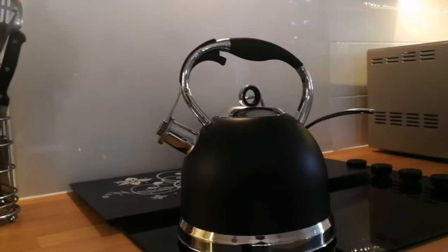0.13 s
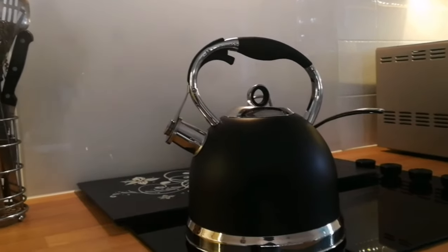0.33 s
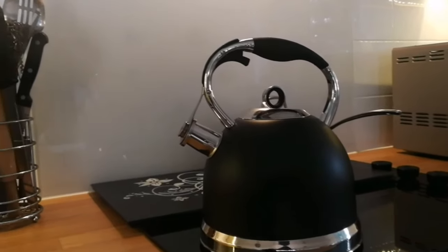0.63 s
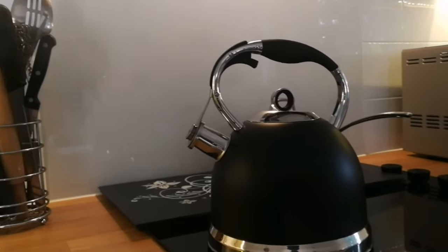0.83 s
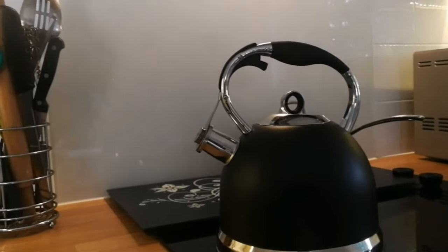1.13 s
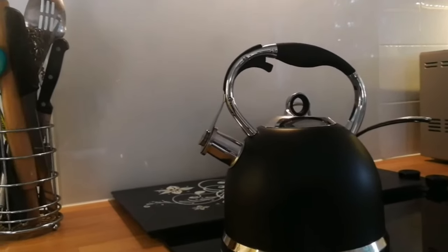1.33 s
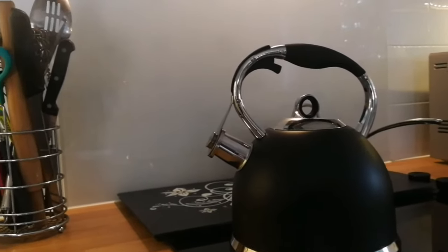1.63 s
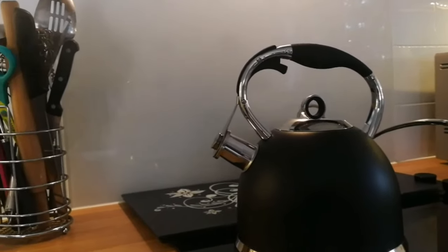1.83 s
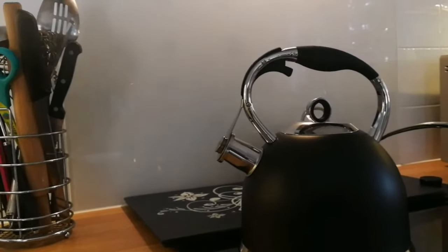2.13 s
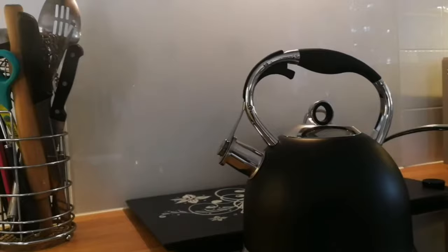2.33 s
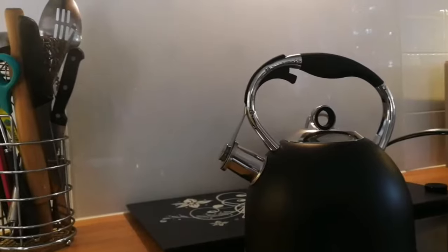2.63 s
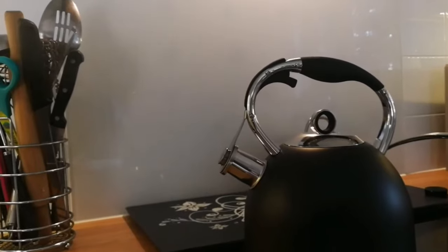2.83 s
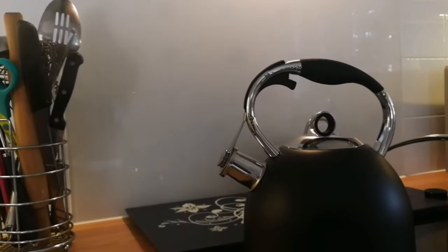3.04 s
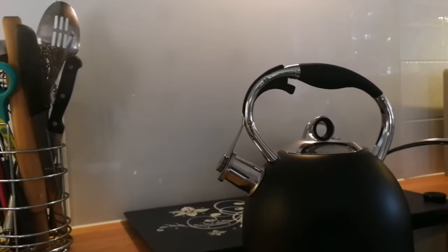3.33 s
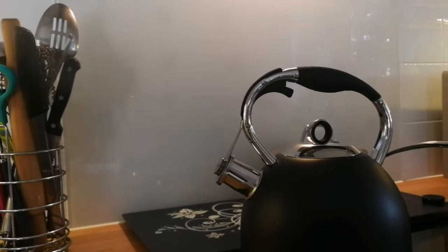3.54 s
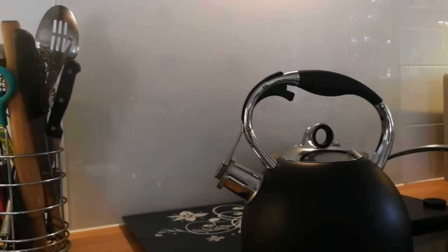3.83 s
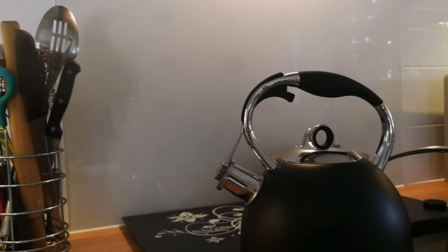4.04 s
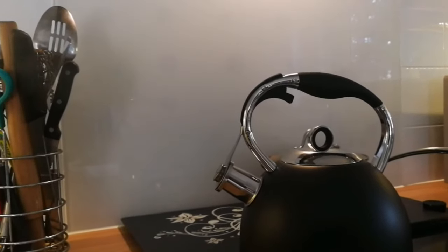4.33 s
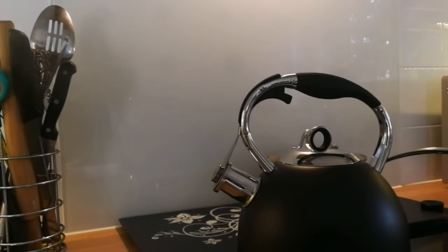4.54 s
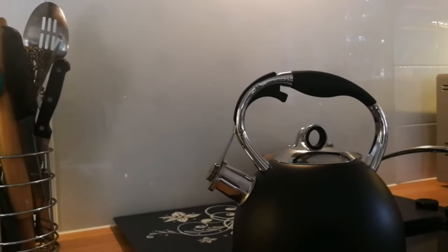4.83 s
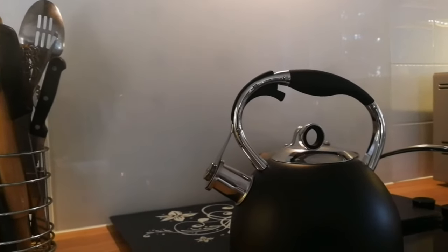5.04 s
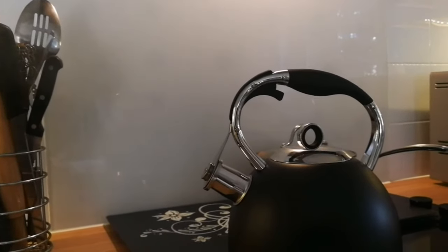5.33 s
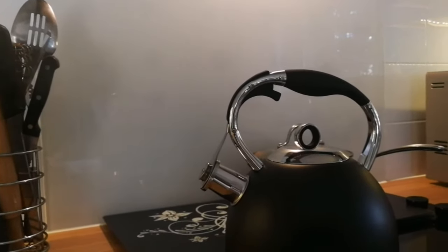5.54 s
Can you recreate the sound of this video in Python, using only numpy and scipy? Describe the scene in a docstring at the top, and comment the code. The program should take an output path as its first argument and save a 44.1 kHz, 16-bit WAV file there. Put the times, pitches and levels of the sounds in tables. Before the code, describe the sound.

A stovetop kettle is already whistling at full boil and never stops. Its single piercing high note wavers slightly in pitch and flutters in loudness, differently at each ear, as the close stereo microphone drifts in a small, hard-walled kitchen. A thin steam hiss and very quiet bubbling rumble lie far beneath, with a few barely noticeable handling thuds in the first half second.

```python
"""In a small kitchen a stovetop kettle whistles at a full boil, heard through a slowly moving stereo microphone.
The jet sings near 4 kHz and sharpens as steam pressure surges; each partial beats with its own dense echoes
off tiles and worktop, so the tone flutters differently at each ear. Shaped, patchy noise makes the hiss at
the spout and the low rumble of the boil; narrow noise rings make the spout's other notes and a brief undertone.
Breathy swells, a faint hum of wavering sines and a few decaying-sine bumps of the hand fill in the rest."""
import sys
import numpy as np
from scipy import signal
from scipy.fft import rfft, irfft
from scipy.io import wavfile
from scipy.ndimage import uniform_filter1d

SR = 44100
rng = np.random.default_rng(int(sys.argv[2]) if len(sys.argv) > 2 else 0)


def wav_record(signal):
    """Record a signal, one row per channel, as 16-bit PCM in the file named by sys.argv[1]."""
    frames = np.transpose(np.atleast_2d(signal))
    bounded = np.clip(frames, -1, 1)
    # unit amplitude maps onto the largest positive 16-bit level
    quanta = np.round(bounded * 32767).astype(np.int16)
    wavfile.write(sys.argv[1], SR, quanta)


N = 250488
TIME = np.arange(N) / SR

# note of the spout, which rises with steam pressure: t/s, f/Hz
WHISTLE_PITCH = [(0.0, 3994), (0.052, 4033), (0.08, 3968), (0.255, 3983), (0.275, 3947), (0.371, 3988),
                 (0.415, 3968), (0.487, 3978), (0.531, 3952), (0.575, 3975), (0.615, 3961), (0.647, 3983),
                 (0.686, 3947), (0.714, 3979), (0.758, 3944), (0.818, 3949), (0.862, 4017), (0.886, 3971),
                 (0.91, 3999), (0.946, 3988), (0.982, 3931), (0.998, 3938), (1.038, 3872), (1.054, 3880),
                 (1.082, 3961), (1.125, 3931), (1.181, 4031), (1.225, 3992), (1.293, 3983), (1.317, 4008),
                 (1.341, 3953), (1.393, 3951), (1.433, 4065), (1.465, 4029), (1.493, 4045), (1.533, 4003),
                 (1.556, 4068), (1.62, 4054), (1.656, 4144), (1.68, 4067), (1.74, 4023), (1.76, 4052),
                 (1.784, 4012), (1.804, 4040), (1.908, 3984), (1.952, 4007), (1.999, 3975), (2.019, 4035),
                 (2.127, 4001), (2.163, 4034), (2.231, 3977), (2.251, 4023), (2.299, 4026), (2.315, 4077),
                 (2.339, 4022), (2.403, 4014), (2.434, 3964), (2.486, 4014), (2.518, 4022), (2.546, 3979),
                 (2.614, 3991), (2.654, 4035), (2.706, 3999), (2.762, 4008), (2.826, 3938), (2.885, 3930),
                 (2.897, 3972), (2.925, 3978), (3.013, 3964), (3.037, 3996), (3.109, 3967), (3.241, 3976),
                 (3.253, 4036), (3.285, 4067), (3.352, 4037), (3.376, 3991), (3.432, 3960), (3.496, 4001),
                 (3.516, 3986), (3.58, 3988), (3.6, 3950), (3.62, 3993), (3.672, 3962), (3.72, 3969),
                 (3.755, 3950), (3.811, 3989), (3.883, 4116), (3.987, 4009), (4.035, 4044), (4.051, 3998),
                 (4.075, 4020), (4.167, 4083), (4.21, 3966), (4.262, 3957), (4.286, 3999), (4.322, 3975),
                 (4.338, 4001), (4.406, 3971), (4.45, 3985), (4.482, 3892), (4.502, 3927), (4.526, 3875),
                 (4.558, 3922), (4.61, 3899), (4.633, 3931), (4.721, 3926), (4.765, 3978), (4.845, 3934),
                 (4.873, 3961), (4.893, 3919), (4.977, 3956), (5.033, 3956), (5.088, 3975), (5.156, 3910),
                 (5.22, 3929), (5.252, 3906), (5.296, 4008), (5.316, 3977), (5.332, 4013), (5.368, 3939),
                 (5.412, 3964), (5.444, 3918), (5.464, 3962), (5.48, 3911), (5.527, 3967), (5.555, 3920),
                 (5.579, 3971), (5.635, 3895), (5.651, 3942), (5.683, 3930)]
# fundamental, drifting as the microphone moves through standing waves: t/s, left level/dB, right level/dB
FUNDAMENTAL_LEVEL = [(0.0, -18.5, -37.0), (0.14, -25.5, -28.5), (0.29, -26.5, -24.5), (0.39, -20.5, -33.0),
                     (0.47, -25.0, -27.5), (0.56, -25.5, -30.0), (0.63, -33.5, -23.5), (0.71, -26.0, -28.5),
                     (0.77, -32.0, -29.5), (0.92, -24.0, -31.0), (1.06, -37.5, -28.0), (1.18, -30.5, -28.0),
                     (1.28, -23.5, -37.5), (1.34, -31.0, -29.0), (1.58, -33.0, -30.5), (1.65, -28.5, -28.5),
                     (1.81, -38.0, -32.0), (1.91, -26.0, -31.5), (2.01, -28.5, -33.0), (2.06, -36.5, -29.5),
                     (2.24, -28.5, -32.5), (2.3, -37.0, -28.0), (2.44, -29.5, -35.0), (2.51, -31.5, -32.0),
                     (2.57, -27.5, -34.0), (2.73, -32.0, -33.0), (2.85, -36.0, -20.5), (2.94, -28.0, -28.0),
                     (3.28, -31.5, -28.0), (3.55, -26.5, -31.0), (3.6, -31.0, -31.5), (3.73, -28.0, -27.5),
                     (3.78, -31.5, -32.0), (3.89, -24.0, -22.0), (3.97, -31.5, -27.0), (4.17, -30.5, -26.5),
                     (4.4, -26.5, -35.0), (4.46, -28.0, -29.0), (4.73, -35.5, -20.0), (4.79, -26.0, -28.5),
                     (4.92, -32.0, -19.5), (5.06, -27.0, -32.5), (5.13, -32.0, -25.0), (5.24, -34.0, -20.5),
                     (5.33, -31.5, -29.5), (5.42, -38.0, -23.0), (5.57, -29.5, -22.5), (5.67, -30.0, -23.0)]
# octave, which also grows when the spout is blown harder: t/s, left level/dB, right level/dB
OCTAVE_LEVEL = [(0.0, -37.0, -37.5), (0.62, -27.5, -38.5), (0.8, -31.0, -40.5), (1.12, -37.0, -35.0),
                (1.24, -30.0, -33.5), (1.37, -34.5, -31.5), (1.59, -27.5, -29.5), (1.92, -32.5, -37.0),
                (2.13, -30.5, -36.5), (2.65, -32.5, -35.5), (3.13, -39.5, -37.0), (3.31, -26.5, -31.5),
                (3.43, -35.5, -36.0), (3.76, -36.5, -36.5), (3.86, -26.5, -32.5), (4.12, -29.5, -32.5),
                (4.35, -30.0, -36.0), (4.58, -34.0, -35.5), (4.72, -28.5, -41.5), (4.82, -29.0, -36.0),
                (4.99, -37.0, -40.0), (5.08, -34.0, -35.0), (5.21, -26.5, -40.5), (5.33, -25.5, -39.0),
                (5.41, -32.0, -39.5), (5.67, -32.0, -39.0)]
# weak upper partials: multiple of the fundamental, left level/dB, right level/dB
UPPER_PARTIALS = [(3, -46, -52), (4, -64, -83)]
# colour of the jet's hiss: f/Hz, relative level per Hz/dB
HISS_SPECTRUM = [(500, -23.5), (750, -14.5), (1150, -8), (1600, -14), (2600, -11.5), (3700, -6),
                 (5000, -11.5), (5700, -5.5), (7200, -3.5), (8500, 0), (11000, -11.5), (12500, -6.5),
                 (13100, -24.5), (15800, -28)]
# spout resonances stirred without locking on, most of them when the pressure sags:
# f/Hz, half-width/Hz, level at mean pressure/dB, level change per unit of pressure/dB
SPOUT_RESONANCES = [(3448, 18, -71.5, -2), (3660, 59, -69.5, -1.5), (4455, 120, -68, 4),
                    (11370, 110, -74.5, -2)]
# colour of boiling water and room: f/Hz, relative level per Hz/dB
RUMBLE_SPECTRUM = [(20, 0.5), (40, -2), (80, -11.5), (135, -4.5), (190, -9.5), (320, -10), (450, -16),
                   (650, -22), (1200, -47)]
# strength of the rumble before its fixed lift and swell: t/s, level/dB
BOIL_LEVEL = [(0, -64.5), (.8, -64.5), (1.5, -63.5), (2.5, -64.5), (3.5, -65), (5.68, -64)]
# hum of a kitchen appliance: f/Hz, rms level/dB
HUM_TONES = [(100, -89), (146, -74), (221, -74), (500, -83.5)]
# likeness of the two ears for noise: f/Hz, correlation
EAR_LIKENESS = [(30, 0.998), (70, 0.975), (140, 0.97), (280, 0.95), (550, 0.03), (1200, 0.25), (4000, 0.03),
                (15000, 0.4)]
# soft bumps of the hand on the microphone: t/s, envelope peak level/dB, f/Hz, decay/s
HAND_BUMPS = [(0.208, -44, 99, 0.0084), (.322, -54, 112, 0.0096), (.54, -50, 89.6, 0.0032),
              (4.372, -59.5, 73, 0.02)]
# short spells of a faint lower note of the spout: t/s, half length/s, level/dB
UNDERTONE_SPELLS = [(0.4, 0.05, -71), (0.758, 0.076, -63.5), (1.01, 0.035, -61), (1.116, 0.038, -59),
                    (2.97, 0.06, -69), (4.496, 0.05, -65), (4.943, 0.087, -64)]
# soft swells of breathy mid-range hiss: t/s, half length/s, f/Hz, half-width/Hz, level/dB
BREATH_SWELLS = [(1.55, 0.24, 1950, 300, -65.5), (1.55, 0.28, 1130, 374, -68),
                 (5.505, 0.22, 1300, 400, -72)]

# pitch shake from slow to fast, before the fits of turbulence scale it
SWAY_HZ, WAVER_HZ, JITTER_HZ = 3.2, 3.4, 1.8
UNREST_DB = 3.6  # extra shake per unit of pressure above or below the mean
# echoes of the fundamental: level against the direct sound, share common to both ears, decay
ECHO_DB, ECHO_SHARED, ECHO_T60_S = 3.8, 0.22, 0.27
RUMBLE_SWELL_DB, RUMBLE_PATCH_DB = 0.7, 1.1  # rms depths
UNDERTONE_HZ, UNDERTONE_WIDTH_HZ = 2907, 28
EDGE_HZ = 15780


def gain_of(db):
    """Decibels to amplitude."""
    return 10 ** (np.asarray(db) / 20)


def evened(x):
    """Scales to rms 1."""
    return x / np.sqrt(np.mean(x ** 2) + 1e-20)


def read(points, hz):
    """Reads a spectrum table along a log-frequency axis."""
    f, value = np.transpose(points)
    return np.interp(np.log(hz + 1), np.log(f + 1), value)


def follow(rows, at):
    """Reads the other columns of a table at given values of its first column."""
    first, *columns = np.transpose(rows)
    return np.array([np.interp(at, first, column) for column in columns])


def wander(rate_hz, size):
    """Smooth random drift of rms 1, with little above rate_hz."""
    hz = np.fft.rfftfreq(size, 1 / SR)
    spectrum = rfft(rng.standard_normal(size)) / (1 + (hz / rate_hz) ** 6)
    return evened(irfft(spectrum, size))


def stereo_noise(shape):
    """Noise of rms 1 with amplitude spectrum shape(hz), closely alike at both ears in the bass only."""
    hz = np.fft.rfftfreq(N, 1 / SR)
    left, other = rfft(rng.standard_normal((2, N)))
    same = np.clip(read(EAR_LIKENESS, hz), -1, 1)
    right = same * left + np.sqrt(1 - same ** 2) * other
    return evened(irfft(np.array([left, right]) * shape(hz), N))


def patchy(noise, patch_db=2.0):
    """Turbulence: patches some 300 Hz wide and 70 ms long come and go in the noise."""
    cells = signal.stft(noise, nperseg=1024, noverlap=768)[2]
    patches = rng.standard_normal(cells.shape[1:])  # one pattern for both ears
    patches = uniform_filter1d(patches, size=7, axis=0)
    patches = evened(uniform_filter1d(patches, size=12, axis=1))
    cells = cells * gain_of(patch_db * patches)
    return evened(signal.istft(cells, nperseg=1024, noverlap=768)[1][:, :N])


def spell(s, half_s):
    """A smooth rise and fall around time s."""
    return np.exp(-((TIME - s) / half_s) ** 2)


def pressure(t):
    """Steam pressure about its mean, in standard deviations, read from the pitch that rises with it."""
    pitch = follow(WHISTLE_PITCH, t)[0]
    return evened(pitch - pitch.mean())


def kitchen(tone, wet_db, shared, t60):
    """The direct sound plus a dense tail of reflections; a share of them reaches both ears alike."""
    t = np.arange(SR // 2) / SR
    taps = rng.standard_normal((3, len(t)))
    taps *= rng.random((3, len(t))) < 1 / 10  # keep one in ten
    taps *= gain_of(-60 * t / t60)
    taps = np.sqrt(1 - shared) * taps[:2] + np.sqrt(shared) * taps[2]
    taps *= gain_of(wet_db) / np.linalg.norm(taps, axis=1, keepdims=True)
    taps[:, 0] += 1  # direct sound
    return signal.fftconvolve(tone[None], taps, axes=1)[:, :len(tone)]


def partial(turns, level_db, span_s, wet_db, shared=0, t60=0.3):
    """One partial beats with its own echoes; the quick flutter rides on the slow level at each ear."""
    heard = kitchen(np.exp(2j * np.pi * turns), wet_db, shared, t60)
    size = int(span_s * SR / 2)
    slow_power = uniform_filter1d(uniform_filter1d(abs(heard) ** 2, size), size)
    fluttering = heard.real * np.sqrt(2 / (slow_power + 1e-9))
    return gain_of(level_db) * fluttering[:, -N:]


def whistle(fitful_db=2):
    """Vortices shed in the spout cap lock into one note. It wobbles with the boil, and turbulence shakes it
    in fits, more so in a surge or a sag. Each quick step of pitch beats against the echo of the note before it."""
    t = np.arange(-SR // 2, N) / SR  # the room is already ringing
    wobble = wander(22.8, len(t))
    wobble = evened(wobble - uniform_filter1d(wobble, size=SR // 8))
    shake = SWAY_HZ * wobble + WAVER_HZ * wander(68, len(t)) + JITTER_HZ * wander(203, len(t))
    shake *= gain_of(UNREST_DB * abs(pressure(t)) + fitful_db * wander(6.5, len(t)))
    turns = np.cumsum(follow(WHISTLE_PITCH, t)[0] + shake) / SR  # phase in cycles

    out = partial(turns, follow(FUNDAMENTAL_LEVEL, TIME), span_s=0.086,
                  wet_db=ECHO_DB, shared=ECHO_SHARED, t60=ECHO_T60_S)
    out += partial(2 * turns, follow(OCTAVE_LEVEL, TIME), span_s=0.27, wet_db=7.5, t60=0.29)
    for multiple, left_db, right_db in UPPER_PARTIALS:
        out += partial(round(multiple) * turns, [[left_db], [right_db]], span_s=0.32, wet_db=3.5, t60=0.19)
    return out


def steam(hiss_db=-53.0, surge_db=0.2, peak_db=0.19, flicker_db=0.4, fitful_db=3):
    """The jet hisses harder at the extremes of pressure, most at its peaks, and fitfully stirs spout resonances."""
    push = pressure(TIME)
    hiss = patchy(stereo_noise(lambda hz: gain_of(read(HISS_SPECTRUM, hz))))
    hiss *= gain_of(hiss_db + surge_db * push + peak_db * push ** 2 + flicker_db * wander(24, N))
    for centre, width, db, pressure_db in SPOUT_RESONANCES:
        ring = stereo_noise(lambda hz: 1 / (1 + ((hz - centre) / width) ** 2))
        hiss += ring * gain_of(db + pressure_db * push + fitful_db * wander(7.0, N))
    return hiss


def boil(lift_db=3):
    """Boiling water rumbles: patchy low noise that swells gently."""
    rumble = patchy(stereo_noise(lambda hz: gain_of(read(RUMBLE_SPECTRUM, hz))), RUMBLE_PATCH_DB)
    return rumble * gain_of(follow(BOIL_LEVEL, TIME) + lift_db + RUMBLE_SWELL_DB * wander(4.9, N))


def hum(unsteady_rad=1.0):
    """A kitchen appliance hums in steady-level sines, each with a slowly wandering phase."""
    out = np.zeros(N)
    for hz, db in HUM_TONES:
        phase = 2 * np.pi * hz * TIME + unsteady_rad * wander(2.0, N)
        out += gain_of(db) * np.sqrt(2) * np.sin(phase)
    return out


def bumps():
    """Each bump of the hand is a dull, low thud: a sine that swells quickly and dies away."""
    out = np.zeros(N)
    for s, db, hz, decay in HAND_BUMPS:
        age = np.maximum(TIME - s, 0)
        envelope = age / decay * np.exp(1 - age / decay)
        out += gain_of(db) * envelope * np.sin(2 * np.pi * hz * age)
    return out


def undertone():
    """The spout's lower note: a narrow, breathy ring that never quite locks on."""
    ring = stereo_noise(lambda hz: 1 / (1 + ((hz - UNDERTONE_HZ) / UNDERTONE_WIDTH_HZ) ** 2))
    return ring * sum(gain_of(db) * spell(s, half_s) for s, half_s, db in UNDERTONE_SPELLS)


def swells():
    """Breathy bands of hiss rise and fall under the whistle."""
    out = np.zeros((2, N))
    for s, half_s, centre, width, db in BREATH_SWELLS:
        breath = stereo_noise(lambda hz: 1 / (1 + ((hz - centre) / width) ** 4))
        out += breath * gain_of(db) * spell(s, half_s)
    return out


def scene():
    """Whistle, steam and the kitchen around them."""
    return whistle() + undertone() + steam() + swells() + boil() + hum() + bumps()


def record(dry):
    """The band limit of the recorder: a steep low-pass at EDGE_HZ."""
    lowpass = signal.firwin(1023, EDGE_HZ, window=("kaiser", 9), fs=SR)
    return signal.oaconvolve(dry, lowpass[None], "same")


dry = scene()
out = record(dry)
wav_record(out)
```